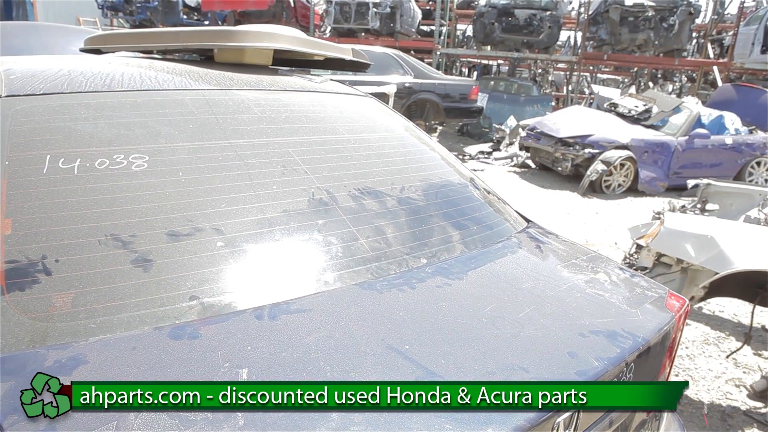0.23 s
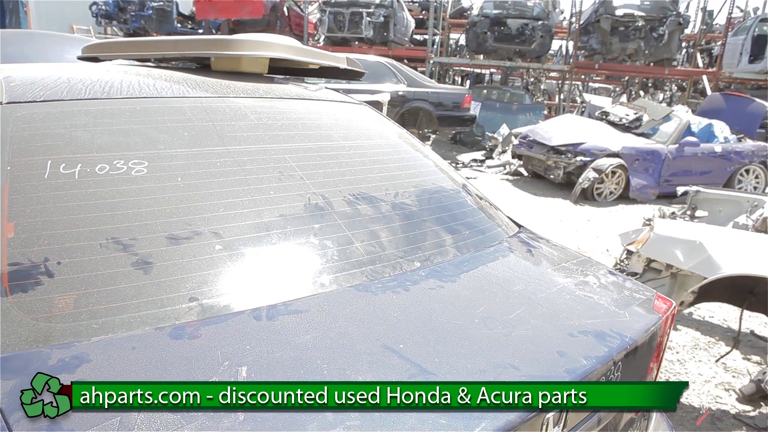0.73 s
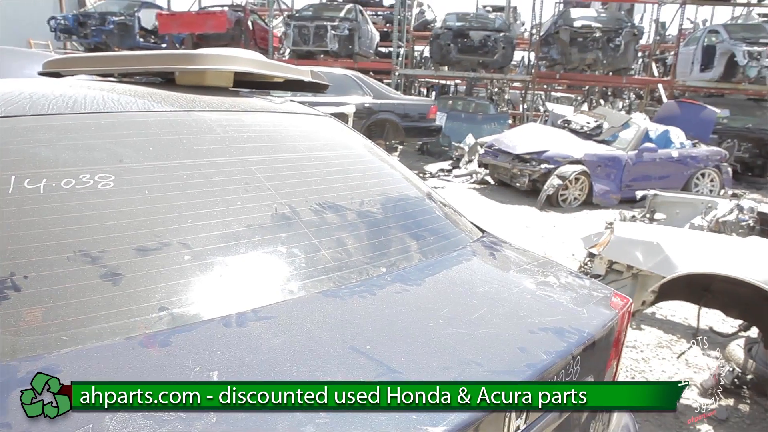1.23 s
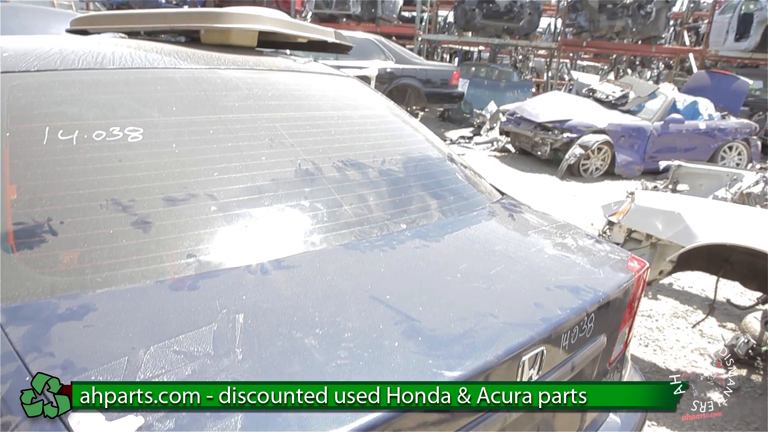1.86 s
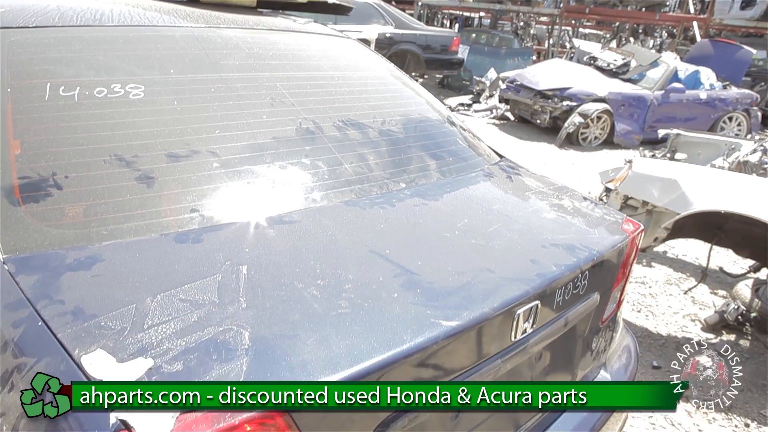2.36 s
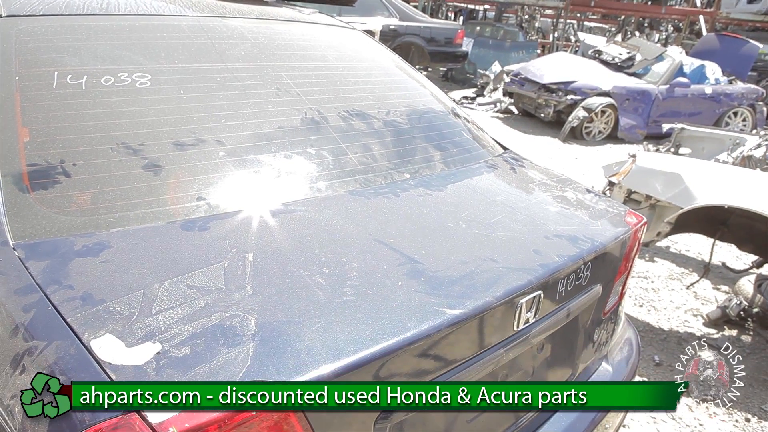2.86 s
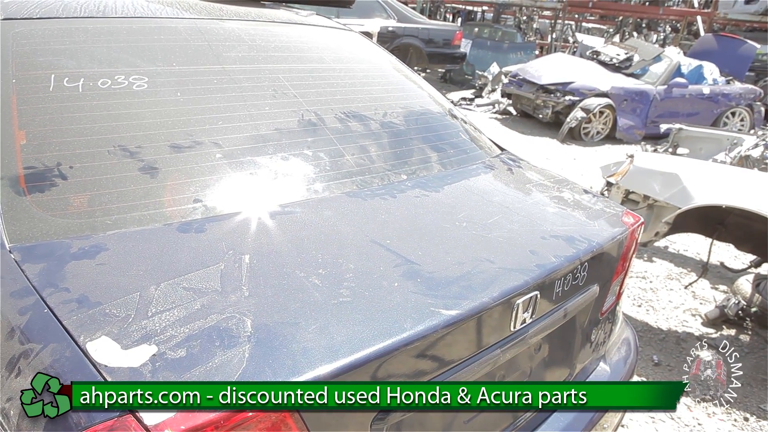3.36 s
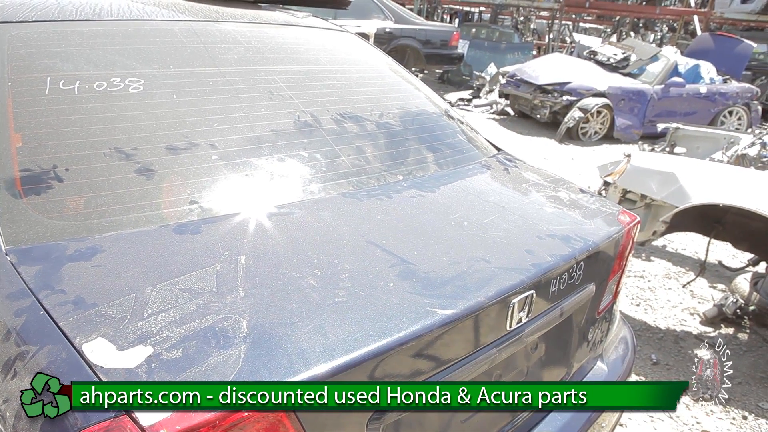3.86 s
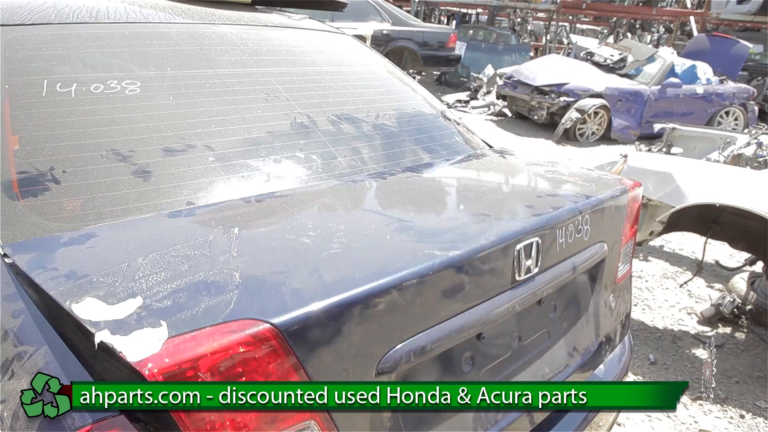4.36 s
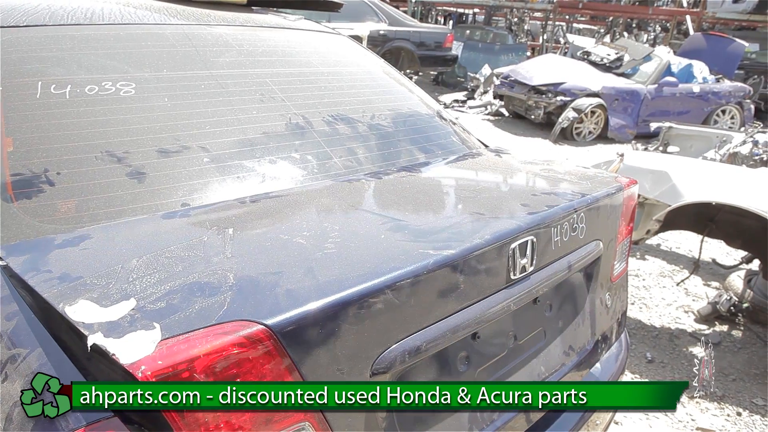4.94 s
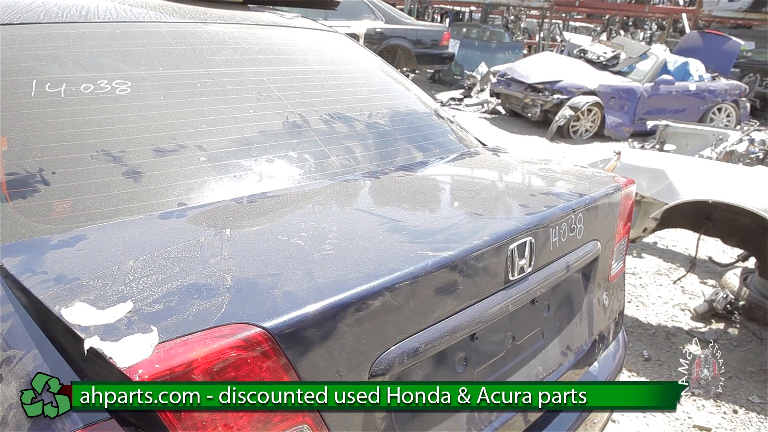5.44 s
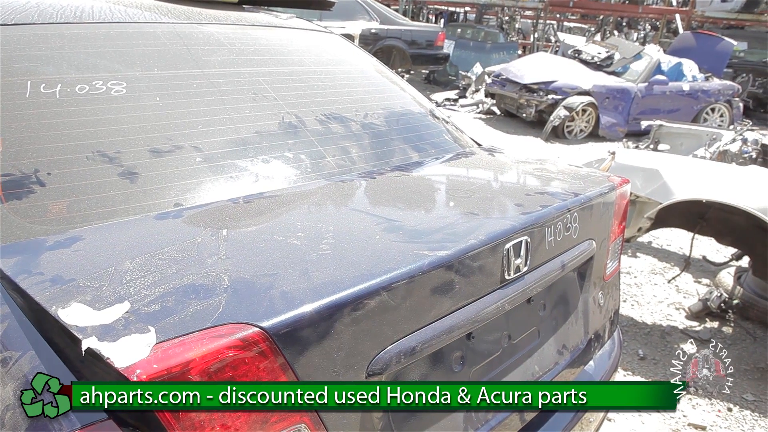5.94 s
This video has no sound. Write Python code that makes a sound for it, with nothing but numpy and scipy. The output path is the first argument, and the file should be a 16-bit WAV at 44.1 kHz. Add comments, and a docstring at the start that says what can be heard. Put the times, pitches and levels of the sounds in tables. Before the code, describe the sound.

A car trunk lid drops on its seal with a deep dull thump, then slams hard into its latch and clacks once more, outdoors.

```python
"""A car's trunk lid drops on its seal with a dull thump, knocks lightly, is slammed into the latch and
clacks once more as it is pressed home: filtered noise and decaying sines, coloured by contact hardness.
Swings of air pressure boom in the body; loose parts rattle, springs ring, hinges rub.
Around it an open salvage yard: shoes scuff on gravel (grainy noise bursts), a far engine picks up
speed (sines at its orders), wind rumbles and air rustles (shaped noise)."""
import sys
import numpy as np
from scipy import signal
from scipy.fft import irfft, next_fast_len
from scipy.io import wavfile
from scipy.ndimage import uniform_filter1d

SR = 44100
rng = np.random.default_rng(int(sys.argv[2]) if len(sys.argv) > 2 else 0)


def waveform_to_disk(signal):
    """Save audio, clipped to [-1, 1], as 16-bit WAV at the path in sys.argv[1]."""
    frames = np.transpose(np.atleast_2d(signal))
    scaled = np.clip(frames, -1, 1) * 32767
    samples = np.round(scaled).astype(np.int16)
    wavfile.write(sys.argv[1], SR, samples)


N = 273861
RING_S = np.arange(32768) / SR  # time since an event

# Spectra of the wind rumble and the open air. Each row: frequency in Hz, level in dB per Hz.
RUMBLE_SPECTRUM = [(8, -12.5), (20, -5), (35, 0.5), (60, -5), (80, -15), (105, -27), (180, -34), (300, -45)]
AIR_SPECTRUM = [(100, 2.5), (200, 3.5), (400, 4), (700, -12), (1200, -26.5), (2200, -18), (5000, -20.5),
                (10000, -20.5), (16000, -22)]
# Level of the wind rumble. Each row: time in seconds, level in dB.
WIND_LEVEL = [(0, -44.5), (2.2, -37), (3.3, -45.5), (4.6, -38), (6.2, -36)]
RUSTLE_DB, RUSTLE_SWELL_DB, RUSTLE_PEAK_S, RUSTLE_WIDTH_S = -77, 10.5, 5.41, .65

# Speed of the far engine. Each row: time in seconds, firing rate in Hz.
ENGINE_RATE = [(0, 34.26), (.8, 33.63), (1.3, 27.62), (2.27, 27.09), (2.662, 39.31), (4.698, 41.2),
               (6.2, 41.61)]
# Engine orders. Each row: multiple of the firing rate, level in dB.
ENGINE_ORDERS = [(.5, -19), (1, 6), (1.5, -15.5), (2, -11), (3, -29.5), (4, -30)]
ENGINE_DB, ENGINE_DB_PER_HZ, LOAD_DB_PER_HZ_PER_S = -39, 0.37, 0.4036  # first: level at the mean rate

# Shoes on gravel. Each row: start in seconds, level in dB, rise in seconds.
SCUFFS = [(.296, -69, 0.0058), (0.362, -58.5, .0012), (.42, -66, 0.012), (.627, -60.5, 0.0036),
          (0.923, -63, 0.0019), (.94, -59.5, 0.024), (1.092, -65, 0.0036), (2.72, -68, .007),
          (2.89, -66, 0.048), (3.51, -70, 0.0036), (5.139, -61, 0.017), (5.39, -65, .01),
          (6.031, -67, .015)]
# Spectrum of gravel, shared by the far rustle. Each row: frequency in Hz, level in dB per Hz.
GRAVEL_SPECTRUM = [(150, -17), (400, 1.5), (800, -1), (1400, -8), (2300, -16.5), (4000, -14.5),
                   (8000, -13.5), (16000, -29.5)]
SCUFF_DECAY_S, SCUFF_CORNER_HZ = .05, 2320

# Jolts that shake the lid's springs. Each row: start in seconds, level in dB.
JOLTS = [(1.731, -88), (3.974, -54.5)]
# Modes of the lid's steel springs. Each row: frequency in Hz, level in dB, t60 in seconds.
SPRING_MODES = [(2800, -10, .6), (2855, -11, .6), (3115, -15, .7), (3257, -16, .7), (3410, 0, .9),
                (3475, -6, .8), (3655, -6, .6), (3762, -9, .6), (3890, -12, .7), (3955, -10, .7)]
# The springs' countless weak modes. Each row: frequency in Hz, level in dB per Hz.
SPRING_WASH_SPECTRUM = [(2400, -19.5), (2800, -2.5), (3500, -5.5), (4200, 8), (5000, -20)]

# Chatter of loose trim and latch parts.
# Each row: start in seconds, level in dB, decay in seconds, corner of the steel tick in Hz.
RATTLES = [(1.733, -74.5, 0.31, 3140), (1.812, -68.5, 0.014, 5000), (3.885, -71, 0.019, 7000),
           (3.98, -52.5, 0.014, 8000), (4.304, -40, 0.011, 4840), (4.353, -43, 0.0078, 12180)]

# Rubbing of hinges and seal as the lid moves down.
# Each row: start in seconds, length in seconds, final level in dB, hardness 0-1.
SWINGS = [(1.49, 0.19, -59, 0.05), (3.80, 0.26, -42, 0.3), (4.249, .095, -40, 0.54)]
SWING_SWELL_DB, SWING_EDGE_S = 16, .012

# The lid flexes and squeezes the air in the trunk. Each row: start in seconds, level in dB,
# pitch in Hz, swell in seconds, level of the body's boom in dB.
THUMPS = [(1.164, -38.5, 81, 0.067, -46.5), (1.474, -32.5, 75, 0.09, -51), (1.7191, 1, 47.7, 0.015, -17),
          (2.265, -26.5, 69.6, 0.035, -40), (3.9608, -4.5, 25.6, 0.028, -15.5)]
# Low modes of the body and its air space. Each row: frequency in Hz, level in dB, t60 in seconds.
BOOM_MODES = [(19.43, -6.5, 1.6), (28.24, 3.5, 1.79), (49.7, 1.5, 0.8), (61, -9, 0.6), (80, -8.5, 1.1),
              (92, -8, 0.8), (115.4, -31, 0.43), (120, -29, 1.9)]

# Spectra of a blow's low thud, panel clang and steel crack. Each row: frequency in Hz, level in dB per Hz.
THUD_SPECTRUM = [(60, -25), (100, -4), (130, 1), (175, -1), (240, -8), (305, -8), (380, -20), (600, -45)]
PANEL_SPECTRUM = [(150, -30), (240, -14), (310, -1), (400, 1), (540, -2), (690, -4), (860, -10),
                  (1080, -15), (1260, -12), (1600, -23), (2050, -21), (2600, -32), (5000, -55)]
STEEL_SPECTRUM = [(700, -25), (1280, -4), (1650, -13), (2100, -3), (2450, -6), (2850, 2), (3150, -2),
                  (3550, 3), (3950, -5), (4300, -3), (5400, -7), (6500, -2), (7500, -9), (10000, -11),
                  (16000, -13)]
# Modes of the sheet-metal lid, then of latch and striker.
# Each row: frequency in Hz, level in dB, t60 in seconds.
LID_MODES = [(248, -15, .5), (301, -3, .3), (339, -6, .35), (398, 2, .36), (420, -4, .3), (506, -6, .25),
             (603, -7, .25), (640, -7, .18), (693, -3, .19), (759, -9, .12), (853, -11, .14),
             (985, -15, .2), (1247, -11, .18), (1599, -23, .14), (1810, -21, .15)]
LATCH_MODES = [(2782, -4, .09), (3326, -7, .08), (3590, 0, .08), (4300, -4, .05), (4900, -6, .05),
               (6310, -5, .05), (6620, -5, .05), (7870, -11, .04)]
# Contact colour, from rubber seal (0) to latch steel on the striker (1). Each row: hardness 0-1,
# thud in dB against the panel, steel in dB against the panel, top of the crack in Hz.
TOUCH = [(0, 11.5, -30, 2500), (0.398, -4, -16.5, 5500), (1, -8.5, -7, 15000)]
# Single knocks of lid and latch. Each row: start in seconds, level in dB, hardness 0-1,
# rise in seconds, factor on the ring time, frequency in Hz favoured by the struck spot.
KNOCKS = [(1.122, -54, 0.27, 0.0016, 1.3, 854), (1.176, -52.5, 0.09, .002, 1.5, 420),
          (1.650, -42, 0.19, .018, 1.37, 403), (2.183, -60.5, 0.06, .002, 0.88, 520),
          (2.248, -57.5, 0.01, 0.012, 1, 650), (2.271, -43.5, 0.07, 0.0051, 1.2, 483),
          (2.529, -61.5, 0, .003, 0.99, 400), (2.613, -45, 0.45, 0.012, 1.28, 390),
          (3.818, -53.5, 0.25, .014, 0.5, 560), (3.873, -51, 1, 0.0025, 4, 750),
          (3.895, -37.5, 0.38, .002, 1.2, 730), (3.945, -37.5, 0.18, 0.011, 1.7, 400),
          (4.072, -49.5, 0.14, 0.0027, 1.2, 400), (4.135, -55.5, 0, .008, 3, 400),
          (4.3031, -35.5, 0.48, 0.0011, 0.97, 430), (4.6115, -50.5, 0.8, .001, .35, 1500),
          (5.175, -51, 1, .0026, 1.12, 1310), (5.614, -59, 0.7, .001, .5, 900)]
# The lid lands and strikes again in quick repeats: bounces under its weight, or chatter at the latch. Each row:
# start in seconds, level in dB, hardness 0-1, factor on the ring time, frequency in Hz favoured by the struck
# spot, seconds between repeats, dB lost per repeat.
CLOSINGS = [(1.721, -40.5, 0.1, 1.45, 530, 0.033, 7), (3.972, -16.5, 0.91, 0.56, 560, .0385, 18),
            (4.3474, -26, 0.71, 0.39, 580, .0145, 5)]
CLOSING_RISE_S = .004
# The whole panel shudders just after landing: delay, level against the landing, two factors, the second
# standing alone as the factor on the ring time.
SHUDDER_S, SHUDDER_DB, SHUDDER_HARDNESS_FACTOR, SHUDDER_RING_FACTOR = .016, -10.5, 0.36, 1.31
CLANG_TOP_SHARE = 0.47  # the clang is dulled above this share of the top of the crack

EDGE_HZ = 15900  # top of the recorded band


def amp(db):
    """Decibels to gain."""
    return 10 ** (np.asarray(db) / 20)


def evened(x):
    """Scales to rms 1."""
    return x / np.sqrt(np.mean(abs(x) ** 2) + 1e-20)


def add(mix, start_s, sound):
    """Mixes a sound in at its start time."""
    part = mix[max(round(start_s * SR), 0):][:len(sound)]
    part += sound[:len(part)]


def noise(spectrum, size, corner_hz=SR):
    """Noise of rms 1 with the given spectrum, rolled off above a corner and below the first row."""
    fft_size = next_fast_len(size)
    hz = np.fft.rfftfreq(fft_size, 1 / SR)
    row_hz, row_db = np.transpose(spectrum)
    gain = amp(np.interp(np.log(hz + 1), np.log(row_hz), row_db, right=-120))
    gain /= np.sqrt(1 + (hz / corner_hz) ** 4)
    gain *= np.minimum(hz / row_hz[0], 1) ** 2
    bins = rng.standard_normal(len(hz)) + 1j * rng.standard_normal(len(hz))
    return evened(irfft(gain * bins, fft_size)[:size])


def dense_modes(spectrum, size):
    """Countless overlapping modes: noise whose power is held even over `size` samples."""
    x = noise(spectrum, len(RING_S))
    return x / np.sqrt(uniform_filter1d(x ** 2, size) + 1e-3)


def grainy(depth_db, size):
    """Random swings of level from tiny contacts, each about `size` samples long."""
    swing = evened(uniform_filter1d(rng.standard_normal(len(RING_S)), size))
    return evened(amp(depth_db * swing))


def strike(rise_s, decay_s):
    """Envelope that swells smoothly, then dies exponentially."""
    swell = np.sin(np.pi / 2 * np.minimum(RING_S / rise_s, 1)) ** 2
    return swell * np.exp(-np.maximum(RING_S - rise_s, 0) / decay_s)


def ring(modes):
    """One row of decaying sine per mode; neighbours start in opposite directions."""
    tones = []
    for k, (hz, db, t60_s) in enumerate(modes):
        decay = amp(db - 60 * RING_S / t60_s)
        tones.append((-1) ** k * decay * np.sin(2 * np.pi * hz * RING_S))
    fade_out = np.minimum((RING_S[-1] - RING_S) * 10, 1)
    return np.array(tones) * fade_out


def yard(air_db=-71, rustle_corner_hz=2500):
    """Low wind rumble, a steady wash of air and a far rustle that swells once."""
    t = np.arange(N) / SR
    rumble = amp(np.interp(t, *np.transpose(WIND_LEVEL))) * noise(RUMBLE_SPECTRUM, N)
    swell = np.exp(-((t - RUSTLE_PEAK_S) / RUSTLE_WIDTH_S) ** 2)
    rustle = amp(RUSTLE_DB + RUSTLE_SWELL_DB * swell) * noise(GRAVEL_SPECTRUM, N, rustle_corner_hz)
    return rumble + rustle + amp(air_db) * noise(AIR_SPECTRUM, N)


def engine(waver=0.017):
    """Low engine orders carry across the yard, louder when fast and while speeding up."""
    rate_hz = np.interp(np.arange(N) / SR, *np.transpose(ENGINE_RATE))
    rate_hz = uniform_filter1d(rate_hz, size=10000)
    speeding_up = np.maximum(np.gradient(rate_hz) * SR, 0)  # Hz per s
    db = ENGINE_DB + ENGINE_DB_PER_HZ * (rate_hz - rate_hz.mean()) + LOAD_DB_PER_HZ_PER_S * speeding_up
    drift = noise([(1, 0), (4, -3), (10, -30)], N)
    turns = np.cumsum(rate_hz * (1 + waver * drift)) / SR
    tones = sum(amp(order_db) * np.sin(2 * np.pi * k * turns) for k, order_db in ENGINE_ORDERS)
    return amp(db) * evened(tones)


def scuffs(grain_db=3):
    """Soles grind small stones: bursts of grainy noise."""
    out = np.zeros(N)
    for start_s, db, rise_s in SCUFFS:
        grind = noise(GRAVEL_SPECTRUM, len(RING_S), SCUFF_CORNER_HZ) * grainy(grain_db, size=150)
        add(out, start_s, amp(db) * grind * strike(rise_s, SCUFF_DECAY_S))
    return out


def echoes(x, wet_db=-16, decay_s=0.068):
    """The wrecks standing around scatter back a faint, dull tail: sparse low-passed random taps."""
    sparse = rng.standard_normal(len(RING_S)) * (rng.random(len(RING_S)) < .05)
    taps = sparse * strike(0.043, decay_s)
    taps = signal.lfilter(*signal.butter(2, 700, fs=SR), taps / np.linalg.norm(taps))
    return amp(wet_db) * signal.fftconvolve(x, taps)[:N]


def springs(wash_db=-3, wash_decay_s=0.051):
    """The springs sing on thinly after a jolt: decaying sines and a short wash of weak modes."""
    out, tones = np.zeros(N), ring(SPRING_MODES).sum(0)
    for start_s, db in JOLTS:
        wash = noise(SPRING_WASH_SPECTRUM, len(RING_S)) * strike(.004, wash_decay_s)
        add(out, start_s, amp(db) * (tones + amp(wash_db) * wash))
    return out


def rattles(per_s=260, tick_decay_s=0.0017, panel_db=2, panel_decay_s=.005):
    """Tiny contacts at random moments, each a tick of steel with a short answer from the panel."""
    out, size = np.zeros(N), len(RING_S)
    for start_s, db, decay_s, corner_hz in RATTLES:
        hits = rng.random(size) < per_s / SR
        hits = hits * rng.uniform(.3, 1, size) * rng.choice([-1, 1], size)
        tick = evened(noise(STEEL_SPECTRUM, size, corner_hz) * strike(0.000075, tick_decay_s))
        answer = evened(noise(PANEL_SPECTRUM, size) * strike(0.00067, panel_decay_s))
        chatter = evened(signal.fftconvolve(hits, tick + amp(panel_db) * answer)[:size])
        add(out, start_s, amp(db) * chatter * strike(0.0066, decay_s))
    return out


def touch(hardness):
    """Thud dB, steel dB and top Hz of a contact, between rubber and steel."""
    scale, *columns = np.transpose(TOUCH)
    return [np.interp(hardness, scale, column) for column in columns]


def swings(grain_db=3.0):
    """Hinges and seal rub in tiny slips: grainy noise in the lid's colours, swelling as it moves down."""
    out, size = np.zeros(N), len(RING_S)
    for start_s, length_s, db, hardness in SWINGS:
        thud_db, steel_db, top_hz = touch(hardness)
        rub = amp(thud_db) * noise(THUD_SPECTRUM, size) + noise(PANEL_SPECTRUM, size)
        rub += amp(steel_db) * noise(STEEL_SPECTRUM, size, top_hz)
        swell = amp(SWING_SWELL_DB * np.minimum(RING_S / length_s - 1, 0))
        fade_in = np.minimum(RING_S / SWING_EDGE_S, 1)
        fade_out = np.exp(-np.maximum(RING_S - length_s, 0) / SWING_EDGE_S)
        add(out, start_s, amp(db) * rub * grainy(grain_db, size=150) * swell * fade_in * fade_out)
    return out


def thumps(boom_rise_s=0.0071):
    """Heavy swings of air pressure, each a swelling low sine, leave the body booming."""
    out = np.zeros(N)
    boom = ring(BOOM_MODES).sum(0) * (1 - np.exp(-(RING_S / boom_rise_s) ** 2))
    for start_s, db, hz, swell_s, boom_db in THUMPS:
        u = RING_S / swell_s
        swell = (u * np.exp(1 - u)) ** 2  # peaks at 1 after swell_s
        push = -swell * np.sin(2 * np.pi * hz * RING_S)
        add(out, start_s, amp(db) * push + amp(boom_db) * boom)
    return out


def favour(hz, spot_hz):
    """Lift in dB of the modes that move most at the struck spot: up to 6 dB, over about an octave."""
    return 6 * np.exp(-(np.log2(np.asarray(hz) / spot_hz) / .45) ** 2)


def dulled(hz, top_hz):
    """Level change in dB (negative) of the modes too fast for a soft contact."""
    return -10 * np.log10(1 + (hz / top_hz) ** 4)


def contacts(count=3):
    """Every blow on the lid: the knocks, and each closing as `count` quick strikes and a shudder."""
    rows = list(KNOCKS)
    for start_s, db, hardness, ring_factor, spot_hz, gap_s, loss_db in CLOSINGS:
        for k in range(count):
            rows.append((start_s + k * gap_s, db - k * loss_db, hardness, CLOSING_RISE_S, ring_factor, spot_hz))
        rows.append((start_s + SHUDDER_S, db + SHUDDER_DB, hardness * SHUDDER_HARDNESS_FACTOR,
                     CLOSING_RISE_S, SHUDDER_RING_FACTOR, spot_hz))
    return rows


def blows(thud_decay_s=0.037, panel_decay_s=0.023, steel_decay_s=0.018, lid_db=-9, latch_db=-6):
    """Each blow gives a low thud, a clang of the panel and a crack of latch steel: noise and modes."""
    out, lid, latch = np.zeros(N), ring(LID_MODES), ring(LATCH_MODES).sum(0)
    lid_hz = [mode[0] for mode in LID_MODES]
    for start_s, db, hardness, rise_s, ring_factor, spot_hz in contacts():
        thud_db, steel_db, top_hz = touch(hardness)
        # a blow that rings longer feeds the modes more
        onset = np.minimum(RING_S / rise_s, 1) * np.sqrt(ring_factor)

        thud = dense_modes(THUD_SPECTRUM, size=500) * strike(rise_s, thud_decay_s * ring_factor)

        colour = [(hz, row_db + favour(hz, spot_hz) + dulled(hz, CLANG_TOP_SHARE * top_hz))
                  for hz, row_db in PANEL_SPECTRUM]
        clang = dense_modes(colour, size=200) * strike(rise_s, panel_decay_s * ring_factor)
        clang += amp(lid_db + favour(lid_hz, spot_hz)) @ lid * onset

        crack = noise(STEEL_SPECTRUM, len(RING_S), top_hz) * grainy(5.1, size=40)
        crack *= strike(rise_s, steel_decay_s * ring_factor)
        # hard blows ring the latch most
        crack += amp(latch_db + .3 * (db + steel_db + 27.0)) * onset * latch

        add(out, start_s, amp(db) * (amp(thud_db) * thud + clang + amp(steel_db) * crack))
    return out


def scene():
    """The lid close by, the yard around it."""
    lid = blows() + swings() + rattles()
    surroundings = yard() + engine() + scuffs()
    return (surroundings + echoes(lid) + springs() + thumps() + lid)[None]


def record(dry):
    """The recorder rounds off the highest peaks, then limits the band."""
    held = dry / (1 + (dry / .92) ** 10) ** .1
    low_pass = signal.firwin(511, EDGE_HZ, window=("kaiser", 9), fs=SR)
    return signal.oaconvolve(held, low_pass[None], "same")


dry = scene()
out = record(dry)
waveform_to_disk(out)
```